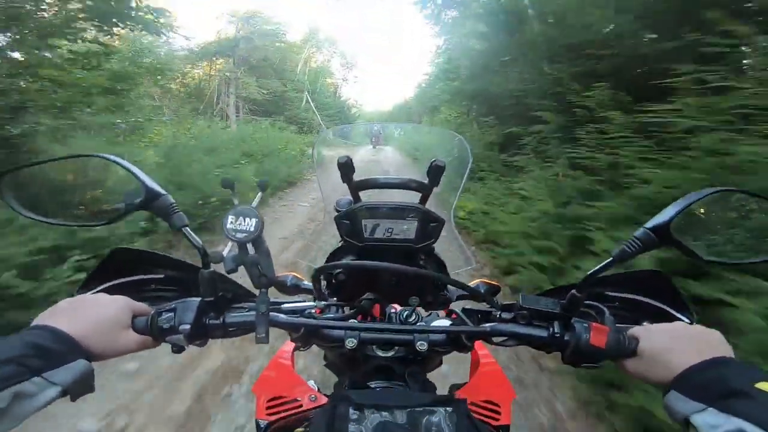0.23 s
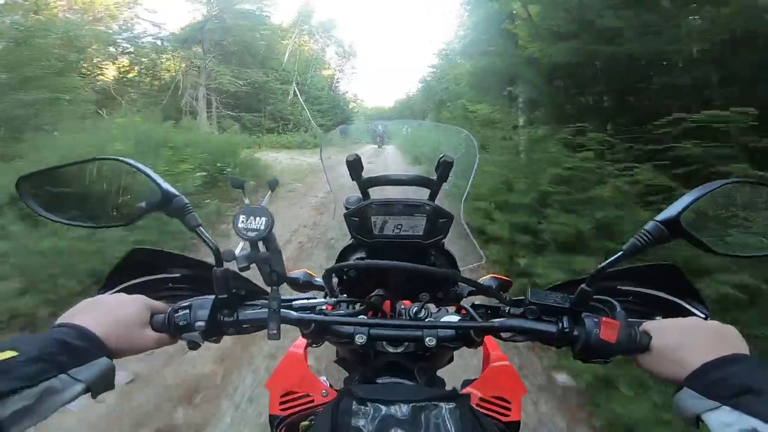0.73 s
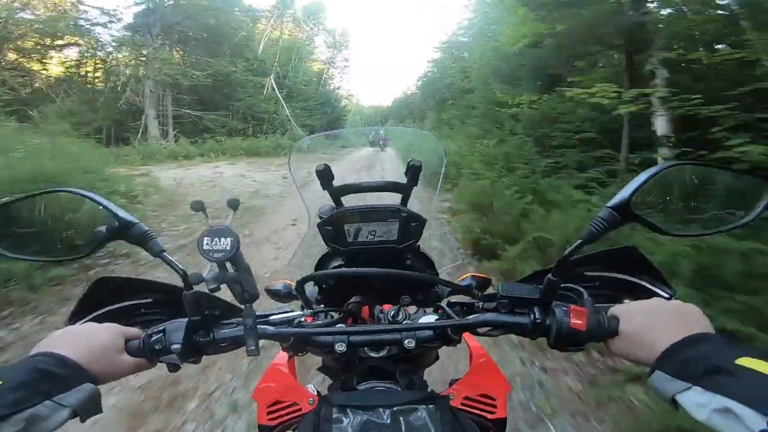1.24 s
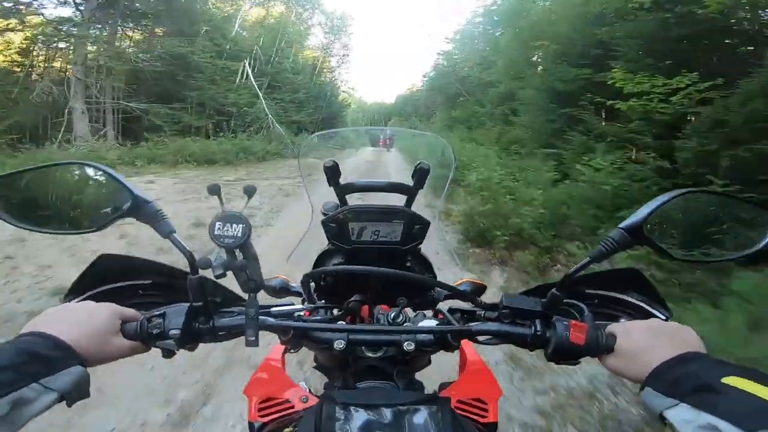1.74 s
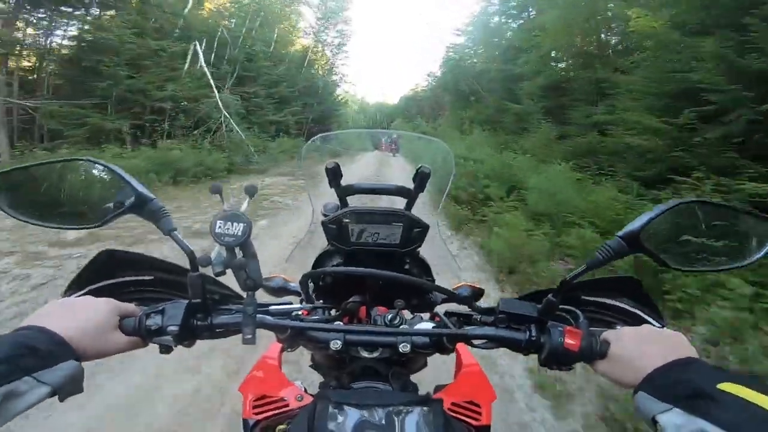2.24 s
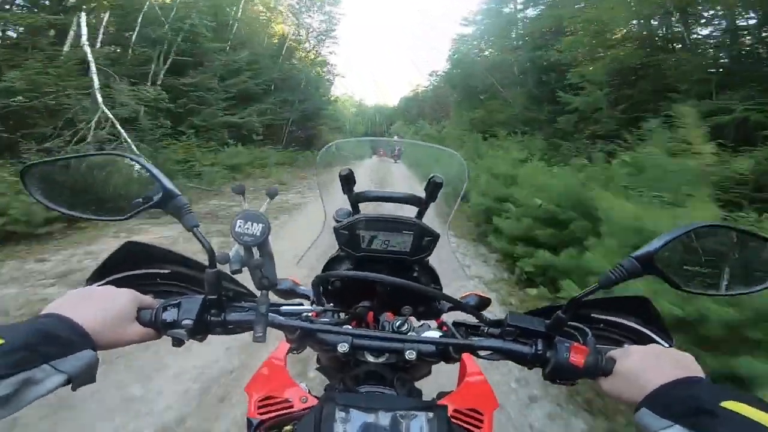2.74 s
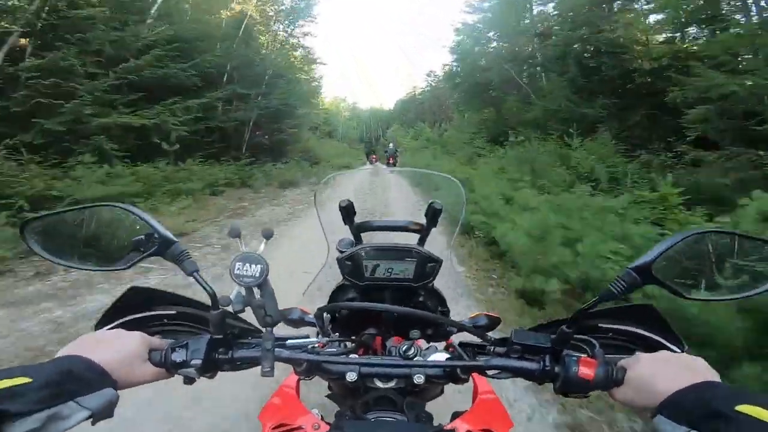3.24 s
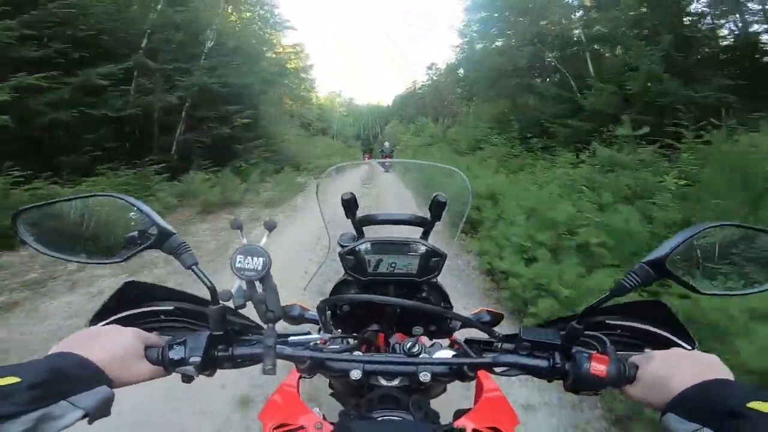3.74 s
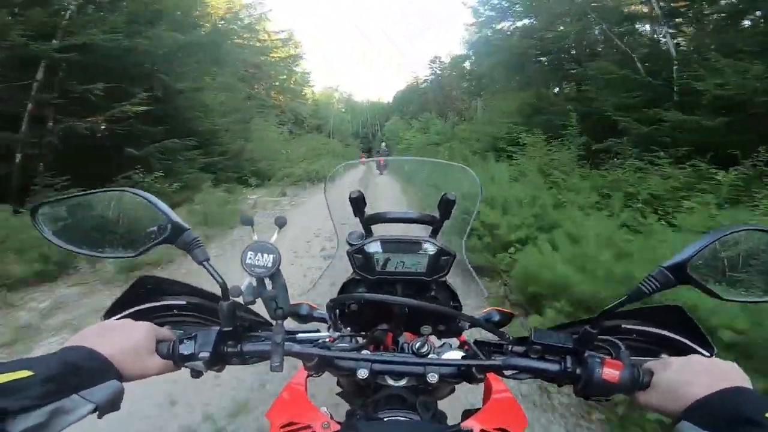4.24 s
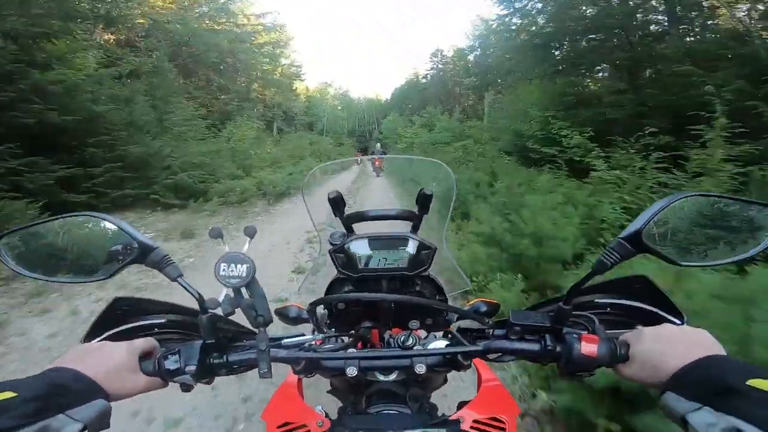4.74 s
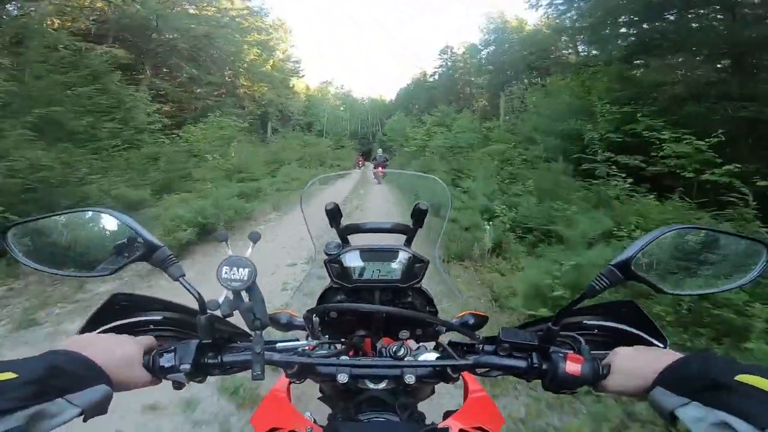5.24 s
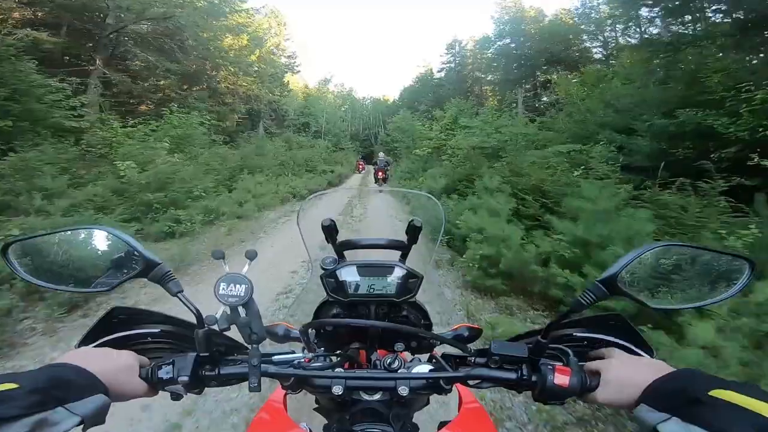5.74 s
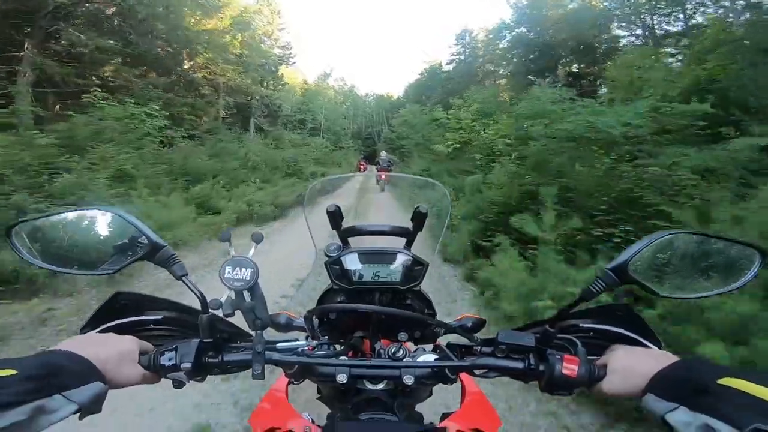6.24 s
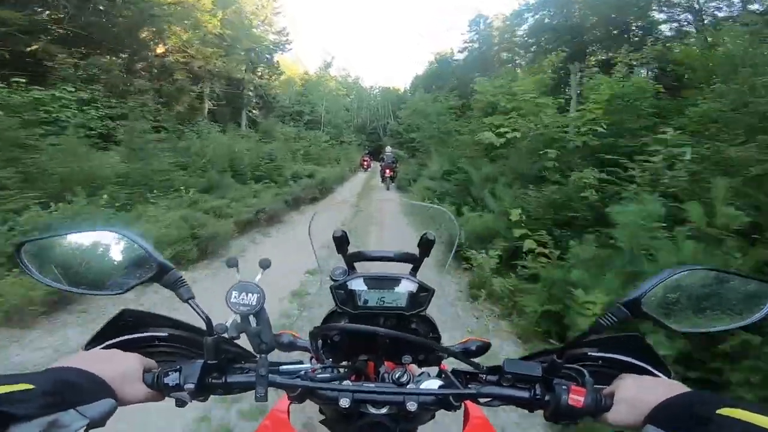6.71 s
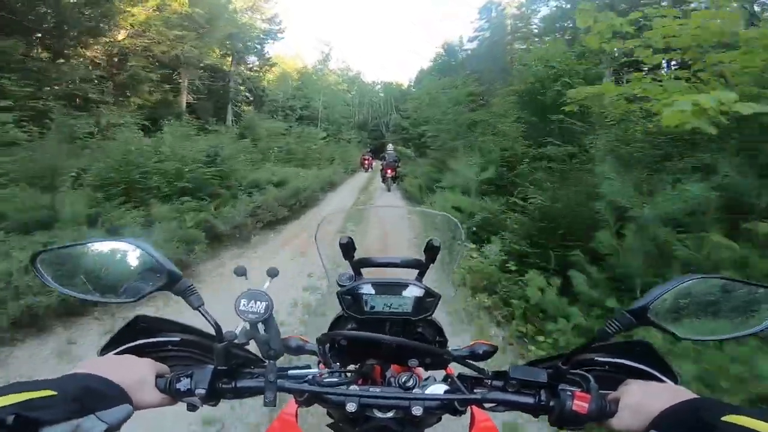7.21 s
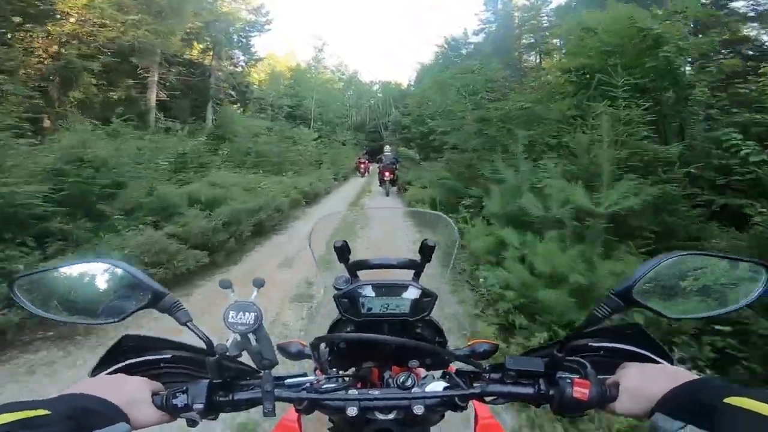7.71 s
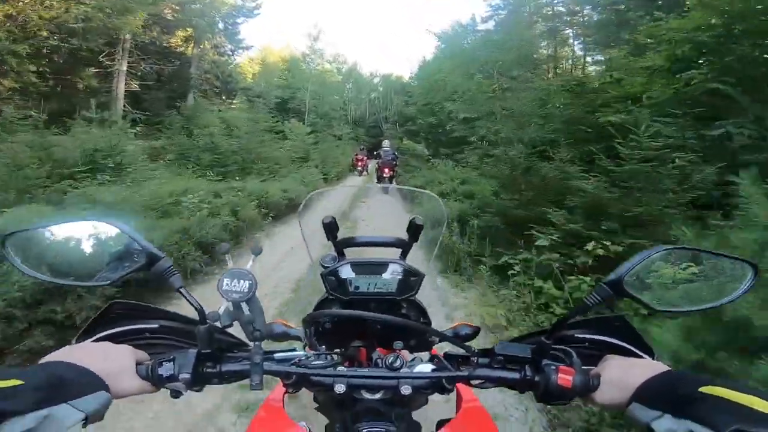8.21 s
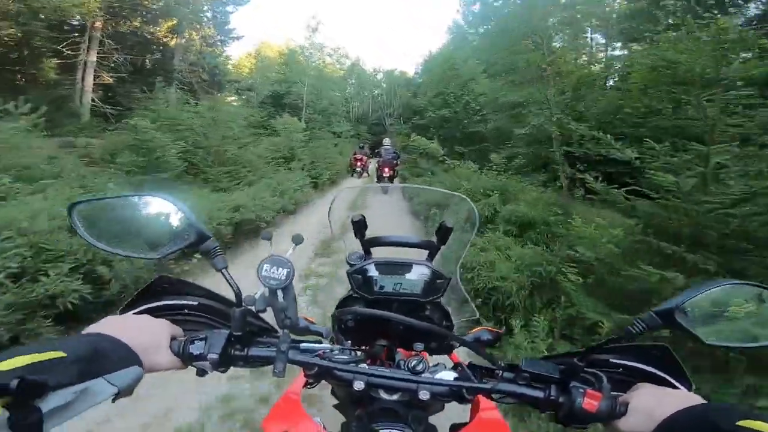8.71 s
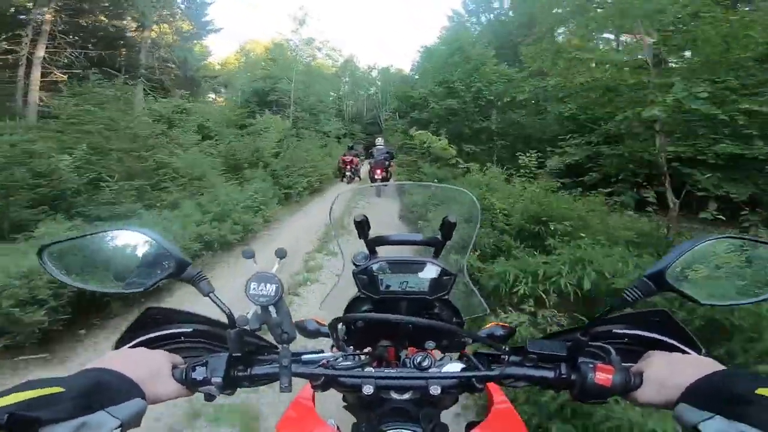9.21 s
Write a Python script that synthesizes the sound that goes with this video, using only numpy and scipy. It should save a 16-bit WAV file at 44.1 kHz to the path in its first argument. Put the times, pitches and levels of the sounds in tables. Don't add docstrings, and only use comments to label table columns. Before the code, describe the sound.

Muffled from the rider's chest, a motorcycle engine pulls steadily, its throttle closes, and it thumps at idle amid tyre crunch and wind buffeting.

```python
import sys
import numpy as np
from scipy import signal
from scipy.fft import rfft, irfft, next_fast_len
from scipy.io import wavfile
from scipy.ndimage import uniform_filter1d, map_coordinates

SR = 44100
rng = np.random.default_rng(int(sys.argv[2]) if len(sys.argv) > 2 else 0)


def to_wav(sig):
    pcm = np.clip(np.atleast_2d(sig), -1, 1) * 32767
    pcm = np.round(pcm).astype(np.int16)
    wavfile.write(sys.argv[1], SR, pcm.T)


def convert_level_to_amplitude(level_db):
    exponent = np.asarray(level_db, float) / 20
    return 10 ** exponent


N = 417186
SECONDS = np.arange(N) / SR

# time in seconds, firings per second.
REVS = [(0, 35), (.75, 34.55), (1.5, 35.3), (2.3, 36), (2.75, 35.7), (3.05, 35.1), (3.27, 33.4),
        (3.5, 33.8), (4.12, 32.3), (4.35, 31.25), (4.58, 31.9), (4.75, 31.2), (5.2, 30.2), (5.5, 26.1)]
# time in seconds, opening from 0 to 1.
THROTTLE = [
    (0, 1),
    (2.05, 1),
    (2.3, .8),
    (2.9, .65),
    (3.6, .45),
    (4.3, .05),
    (9.5, .05),
]
# multiple of firing rate, level in dB.
PULL_ORDERS = [(1, 0.5), (2, 1), (3, -4), (4, 2), (5, -8), (6, -8), (7, -3), (8, -0.5), (9, -2.5), (10, -4),
               (11, -13), (12, -4.5), (13, -10), (14, -13), (15, -14.5), (16, -13), (17, -14), (18, -29),
               (19, -26.5), (20, -19), (21, -20.5), (22, -20.5), (23, -16.5), (24, -16.5)]
OVERRUN_ORDERS = [(1, -4), (2, 0), (3, -6), (6, -22), (7, -20), (8, -20), (9, -16), (10, -19), (11, -17),
                  (12, -15), (13, -22)]
# centre in Hz, width in Hz, level in dB.
PIPE_MODES = [(60, 55, -4), (113, 53, 2.5), (270, 110, -6), (420, 200, -22)]
# centre in Hz, width in Hz, level in dB.
CRANKCASE_MODES = [(1067, 82, 0), (1348, 99, 2)]
# centre in Hz, width in Hz, level in dB.
HEAD_MODES = [(1615, 70, 0), (1900, 400, -6)]
# centre in Hz, width in Hz, level in dB.
COVER_MODES = [(2705, 425, 0)]
COVER_LOAD_MODES = [(2507, 100, 1.5), (2394, 30, -1)]
COVER_IDLE_MODES = [(2816, 84, 2.5), (3040, 180, -9.5), (3305, 240, -10.5)]
# frequency in Hz, density in dB per Hz.
BUFFET_COLOUR = [(8.8, -32), (15, 1), (76, 6.5), (113, 4), (145, -3.5), (203, -4), (300, -5), (390, -38.5),
                 (660, -120)]
# frequency in Hz, density in dB per Hz.
JOLT_COLOUR = [(71, -43), (120, -7), (145, -3.5), (215, -11), (280, -3.5), (421, -10.5), (622, -24),
               (700, -19), (910, -56), (1540, -120)]
# frequency in Hz, density in dB per Hz.
ROAR_COLOUR = [(300, -21), (450, 0), (600, -8.5), (700, -4.5), (900, -5), (1500, -2.5), (2300, -8.5),
               (3000, -14.5), (3600, -35)]
# frequency in Hz, density in dB per Hz.
CRUNCH_COLOUR = [(2300, -42.5), (2800, -3), (3300, 0.5), (3800, -4), (4050, -5.5), (4250, -9.5),
                 (4400, -8.5), (4650, -14.5), (5100, -17), (5600, -39.5)]
# frequency in Hz, density in dB per Hz.
HISS_COLOUR = [(4500, -20), (5200, -2), (5900, 0.5), (6100, 1), (6500, -0.5), (7300, 3), (7700, -4.5),
               (8300, -8.5), (9300, -5.5), (9900, -9.5), (10900, -8.5), (12000, -18), (13400, -29),
               (14500, -56.5)]
# frequency in Hz, density in dB per Hz.
PLATE_COLOUR = [(500, -36), (900, 19), (2000, 16.5), (3000, 7), (4500, -2), (5500, -13), (7000, -9.5),
                (8000, -20), (11000, -25), (13000, -30.5), (15000, -63)]
# time in seconds, peak in dB.
STONES = [(0.2678, -36.5), (0.3264, -44.5), (6.2296, -51), (6.7315, -52), (6.98, -48.5), (7.7615, -43.5),
          (7.7854, -36), (7.9384, -49), (8.161, -50.5), (8.335, -51), (8.805, -48)]
# time in seconds, peak in dB.
KNOCKS = [(1.555, -11.5), (2.121, -39), (2.372, -30), (2.912, -18.5), (3.93, -23), (5.451, -15.5),
          (5.724, -29.5), (6.831, -15), (7.787, -25), (8.251, -26), (8.33, -18.5), (9.067, -28.5)]
# time in seconds, half length in seconds, lift in dB.
BUMPS = [(0.297, 0.14, 12), (0.697, 0.17, 2.5), (1.555, 0.066, -0.5), (1.964, 0.072, 14), (2.25, .1, 9.5),
         (2.55, .12, 7), (3.588, 0.56, 10.5), (4.192, 0.2, 6), (5.1, 0.099, 1), (5.456, 0.31, 10),
         (5.72, 0.11, 12), (5.99, .12, 6), (6.856, 0.089, 11.5), (7.303, 0.13, -1), (7.75, 0.14, 0),
         (8.388, .22, 15.5), (8.75, 0.11, 0.5), (9.1, 0.056, 4.5)]
# time in seconds, buffet in dB.
WIND = [(0, -52), (.3, -41), (.65, -31.5), (1.1, -34.5), (1.55, -32), (1.8, -39), (2.4, -34.5), (3, -42),
        (3.65, -29.5), (4.3, -41.5), (4.8, -42), (5.55, -40.5), (5.8, -30), (6.3, -38), (7, -33),
        (8, -35.5), (8.45, -30), (9.46, -36)]
# time in seconds, level in dB.
RACKET = [(0.0, -31), (1.21, -30), (2.63, -32.5), (3.05, -31.5), (3.13, -33.5), (3.58, -32.5),
          (3.77, -36.5), (4.27, -34.5), (4.32, -38.5), (4.58, -34.5), (5.09, -33.5), (6.14, -39),
          (6.61, -34.5), (7.14, -37), (7.19, -38.5), (7.93, -35), (8.59, -41.5), (9.46, -37)]
# time in seconds, lean.
LEAN = [(0, -.2), (.5, -0.54), (1.3, 0.1), (2, .3), (2.6, 0.69), (3.15, 0.52), (3.6, -0.57), (4.2, 0.035),
        (4.6, -.6), (5, 0.3), (5.25, 2.3), (5.4, .05), (5.9, -0.098), (7, -0.77), (7.8, -1.1), (8.2, -.8),
        (8.6, -0.8), (9.46, -.8)]

IDLE_S, SAG_S = 6.203, 8.414
IDLE_HZ, SAGGED_HZ = 28 / 2.211, 12.36
CLUTCH_S, FREED_DB_PER_S2 = 5.441, 95
BRAKE_S, BRAKE_RISE_S, BRAKE_FALL_S = 5.3, 1, 0.092
SETTLE_S = 1.2


def unit(x):
    return x / np.sqrt(np.mean(x ** 2) + 1e-20)


def curve(rows):
    s, value = np.transpose(rows)
    return np.interp(SECONDS, s, value)


def wobble(rate):
    knots = rng.standard_normal(int(N * rate / SR) + 4)
    return map_coordinates(knots, [np.arange(N) * rate / SR])


def filtered(x, response):
    m = next_fast_len(N + SR // 2)
    return irfft(rfft(x, m) * response(np.fft.rfftfreq(m, 1 / SR)), m)[:N]


def coloured(x, points):
    f, db = np.transpose(points)

    def response(hz):
        return convert_level_to_amplitude(np.interp(np.log(hz + 1), np.log(f + 1), db, left=-120, right=-120))
    return unit(filtered(x, response))


def rung(x, modes, order=2):
    def response(hz):
        total = 0
        for k, (centre, width, db) in enumerate(modes):
            damping = 1j * hz * width
            total = total + (-1) ** k * convert_level_to_amplitude(db) * (damping / (centre ** 2 - hz ** 2 + damping)) ** order
        return total
    return unit(filtered(x, response))


def sliding(x, hz, width_hz):
    turn = np.exp(2j * np.pi * np.cumsum(hz) / SR)
    pole = np.exp(-np.pi * width_hz / SR)
    ring = signal.lfilter([1], np.poly([pole, pole]), x / turn)
    return unit((ring * turn).real)


def patchy(depth_db):
    z = signal.stft(rng.standard_normal(N), nperseg=512)[2]
    field = uniform_filter1d(rng.standard_normal(z.shape), 5, 0)
    field = uniform_filter1d(field, 10, 1)
    return signal.istft(z * convert_level_to_amplitude(depth_db * unit(field)), nperseg=512)[1][:N]


def gate(cycles, sharp, scatter_db):
    whole = np.round(cycles).astype(int)
    whole = whole - whole.min()
    size = convert_level_to_amplitude(scatter_db * rng.standard_normal(whole.max() + 1))[whole]
    return size * np.exp(sharp * (np.cos(2 * np.pi * cycles) - 1))


def blows(cycles, scatter_db):
    clicks = np.diff(np.floor(cycles), prepend=np.floor(cycles[0]))
    return unit(clicks * convert_level_to_amplitude(scatter_db * rng.standard_normal(N)))


def bursts(events, t60):
    out, t = np.zeros(N + SR), np.arange(SR // 10) / SR
    for s, db in events:
        out[round(s * SR):][:len(t)] += convert_level_to_amplitude(db - 60 * t / t60) * rng.standard_normal(len(t))
    return out[:N]


def crank():
    idle = [(IDLE_S, IDLE_HZ), (SAG_S, IDLE_HZ), (SAG_S + 1 / IDLE_HZ, SAGGED_HZ)]
    rate = curve(list(REVS) + idle)
    fired = np.cumsum(rate) / SR
    return fired - fired[round(IDLE_S * SR)], rate


def idling(rate):
    return np.clip((26 - rate) / 12, 0, 1)


def shake():
    return sum(db * np.exp(-((SECONDS - s) / half) ** 2) for s, half, db in BUMPS)


def driven(mean_db, db_per_db):
    racket_db = curve(RACKET)
    return mean_db + db_per_db * (racket_db - racket_db.mean())


def wind():
    noise = coloured(patchy(0.96), BUFFET_COLOUR)
    return convert_level_to_amplitude(curve(WIND) + 2.5) * unit(convert_level_to_amplitude(2 * wobble(7)) * noise)


def gravel_grains():
    strength_db = 3.4 * np.minimum(rng.exponential(size=N), 5)
    return unit((rng.random(N) < 900 / SR) * convert_level_to_amplitude(strength_db) * rng.choice([-1, 1], N))


def hiss(fired, grains):
    air = patchy(1.3) * (6 + gate(fired, sharp=2.1, scatter_db=4))
    return convert_level_to_amplitude(driven(-70, 0.95)) * coloured(air + 0.5 * grains, HISS_COLOUR)


def gravel_crunch(rate, terrain, grains):
    crunch = coloured(patchy(0.37) + 0.58 * grains, CRUNCH_COLOUR)
    level_db = driven(-52, 0.89) - 6 * idling(rate)
    return convert_level_to_amplitude(level_db + 0.18 * terrain + 0.27 * wobble(30)) * crunch


def tyre_roar(fired, terrain):
    swell = convert_level_to_amplitude(0.9 * terrain) + 0.59 * gate(fired, sharp=3.3, scatter_db=0)
    return convert_level_to_amplitude(driven(-40.5, 0.66)) * unit(swell * coloured(patchy(1.4), ROAR_COLOUR))


def jolts(rate, terrain):
    level_db = -47.45 + 12 * np.sqrt(curve(THROTTLE)) - 3 * (idling(rate) > 0.97) + 0.8 * shake()
    rough = convert_level_to_amplitude(1.5 * terrain + 2.6 * wobble(70))
    return convert_level_to_amplitude(level_db) * unit(rough * coloured(patchy(1.1), JOLT_COLOUR))


def stone_pings():
    spray = bursts(STONES, t60=0.077)
    return convert_level_to_amplitude(7.5) * np.std(spray) * coloured(spray, PLATE_COLOUR)


def loose_knocks():
    def response(hz):
        damping = 1j * hz * 700
        return convert_level_to_amplitude(5) * damping / (450 ** 2 - hz ** 2 + damping) / (1 + 1j * hz / 1800) ** 3
    return filtered(bursts(KNOCKS, t60=0.05), response)


def strikes(fired, rate, steady, tick):
    fast = 1 - idling(rate)
    turns = 2 * fired + 0.45
    swell = gate(turns, 2.2 - 1.7 * fast, scatter_db=2)
    rattle = ((0.75 + 0.25 * fast) * steady + swell) * patchy(0.9)
    return rattle + 1.5 * tick * fast * blows(turns, scatter_db=1)


def fairing(fired, rate):
    buzz_hz = np.clip(140 * rate, 4050, 4350)
    buzz = sliding(strikes(fired, rate, 0.9, tick=0.2), buzz_hz, width_hz=260)
    return convert_level_to_amplitude(driven(-67.5, 0.34) + 11 * fork_dive()) * buzz


def fork_dive():
    return curve([(BRAKE_S - BRAKE_RISE_S, 0), (BRAKE_S, 1), (BRAKE_S + BRAKE_FALL_S, 0)])


def gear_cover(fired, rate):
    throttle, slow = curve(THROTTLE), idling(rate)
    settled = curve([(IDLE_S, 0), (IDLE_S + SETTLE_S, 1)])
    whine_hz = 2432 + 34 * (rate - 35)
    whine_phase = np.cumsum(whine_hz) / SR + 0.12 * wobble(40)
    whine = convert_level_to_amplitude(2 * wobble(12)) * np.sin(2 * np.pi * whine_phase)
    whine = whine + 0.6 * sliding(strikes(fired, rate, 0.9, tick=0.1), whine_hz, width_hz=40)
    loaded = rung(strikes(fired, rate, 0.6, tick=0.93), COVER_LOAD_MODES)
    unloaded = rung(strikes(fired, rate, 1, tick=0), COVER_IDLE_MODES)
    cover = 0.83 * throttle ** 6 * whine + 0.44 * throttle * loaded
    cover = cover + (0.45 * slow + 0.64 * settled ** 2) * unloaded
    cover = cover + 0.46 * rung(strikes(fired, rate, 1, tick=0), COVER_MODES)
    return convert_level_to_amplitude(driven(-41.44, 0.21) - 8.5 * slow) * cover


def cylinder_head(fired, rate):
    lean, fast = curve(LEAN), 1 - idling(rate)
    low = sliding(strikes(fired, rate, 1.3 + 0.27 * fast, tick=0.72), 1831 + 97.5 * lean, width_hz=154)
    high = sliding(strikes(fired, rate, 1, tick=0.96), 1993 + 70 * lean, width_hz=136)
    still = rung(strikes(fired, rate, 0.66, tick=0.7), HEAD_MODES)
    head = low + (0.43 + 0.25 * fast) * high + 0.49 * (1 + fork_dive()) * still
    return convert_level_to_amplitude(driven(-40, 0.95) - 0.5 * lean) * head


def crankcase(fired, rate):
    lean = curve(LEAN)
    moving = sliding(strikes(fired, rate, 1, tick=0.8), 1246 + 22 * lean, width_hz=115)
    still = rung(strikes(fired, rate, 1, tick=0.11), CRANKCASE_MODES)
    return convert_level_to_amplitude(driven(-42.56, 0.65) + 0.5 * lean) * (moving + 0.73 * still)


def shaft_order(fired, k, db, drift_db):
    level = convert_level_to_amplitude(db + drift_db * wobble(5)) * np.sqrt(2)
    phase = k * fired + rng.random() + (0.02 + 0.005 * k) * wobble(10)
    return level * np.sin(2 * np.pi * phase)


def order_stack(fired, orders):
    return unit(sum(shaft_order(fired, k, db, 2.6) for k, db in orders if k not in (4, 5)))


def drone(fired, rate):
    throttle = curve(THROTTLE)
    freed = convert_level_to_amplitude(-FREED_DB_PER_S2 * np.clip(SECONDS - CLUTCH_S, 0, None) ** 2)
    pull, overrun = order_stack(fired, PULL_ORDERS), order_stack(fired, OVERRUN_ORDERS)
    stack = convert_level_to_amplitude(-31.5 + 4 * np.sqrt(throttle)) * (throttle * pull + (1 - throttle) * overrun)
    frame_mode = convert_level_to_amplitude(-37.5) / (1 + 2 * ((5 * rate - 154) / 14) ** 2)
    fifth_db = 20 * np.log10(throttle ** 2 * convert_level_to_amplitude(-39) + frame_mode)
    boom = shaft_order(fired, 4, -28 - 5 * throttle ** 4, drift_db=1.2)
    boom = boom + shaft_order(fired, 5, fifth_db, drift_db=1.8)
    return freed * (stack + freed * boom)


def exhaust(fired, rate):
    push = blows(fired + 0.07, scatter_db=0.9) - 0.7 * blows(fired + 0.1594, scatter_db=0.5)
    push = filtered(push, lambda hz: 1 / (1 + 1j * hz / 400) ** 3)
    puff = gate(fired + 0.041, sharp=2.03, scatter_db=2) * rng.standard_normal(N)
    puff = filtered(puff, lambda hz: 1 / (1 + 1j * hz / 900) ** 2)
    push_share = np.clip(1.3 - rate / 30, 0, 1)
    beat = push_share * rung(push, PIPE_MODES) + 0.33 * rung(puff, PIPE_MODES)
    level = np.sqrt(np.abs(uniform_filter1d(beat ** 2, SR // 2)))
    return convert_level_to_amplitude(-35 + 5.5 * (idling(rate) > 0.97) + 0.32 * shake()) * beat / level


def scene():
    fired, rate = crank()
    terrain, grains = wobble(14), gravel_grains()
    track = wind() + hiss(fired, grains) + gravel_crunch(rate, terrain, grains)
    track = track + tyre_roar(fired, terrain) + jolts(rate, terrain) + stone_pings() + loose_knocks()
    clatter = fairing(fired, rate) + gear_cover(fired, rate)
    clatter = clatter + cylinder_head(fired, rate) + crankcase(fired, rate)
    return (track + clatter + drone(fired, rate) + exhaust(fired, rate))[None]


def roll_off(x):
    return signal.sosfilt(signal.butter(12, 13480, fs=SR, output="sos"), x)


def record(dry):
    mix = dry * np.clip(SECONDS / 0.002, 0, 1)
    return roll_off(mix)


dry = scene()
out = record(dry)
to_wav(out)
```